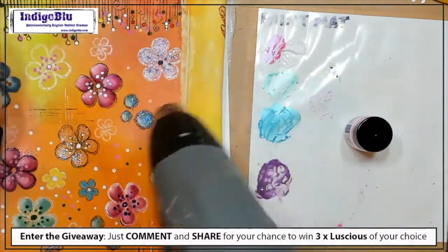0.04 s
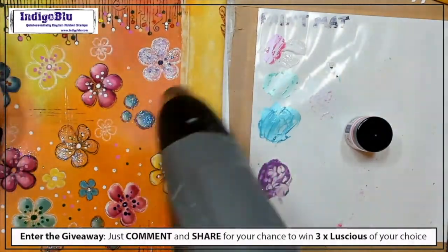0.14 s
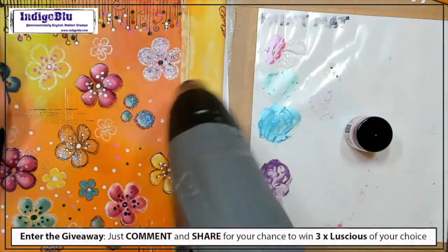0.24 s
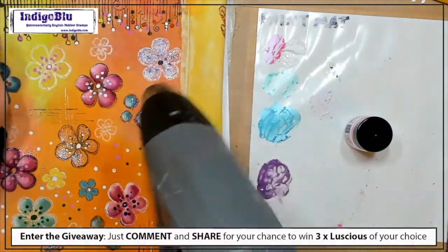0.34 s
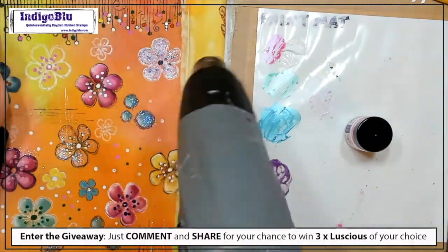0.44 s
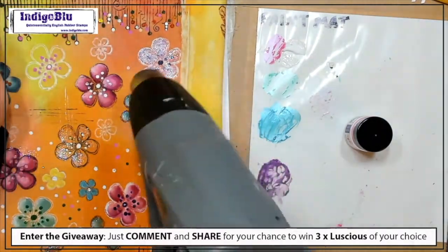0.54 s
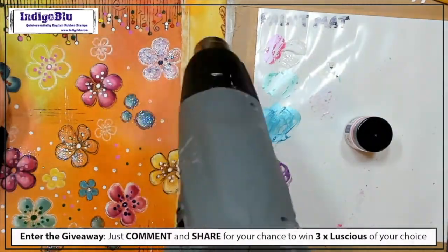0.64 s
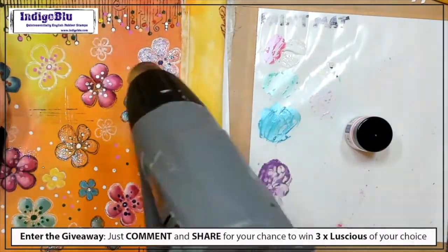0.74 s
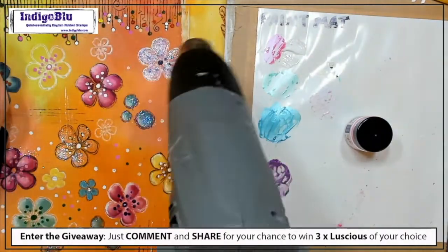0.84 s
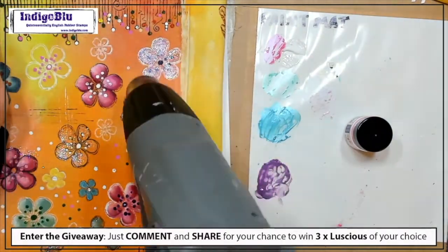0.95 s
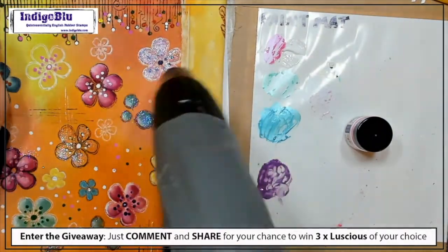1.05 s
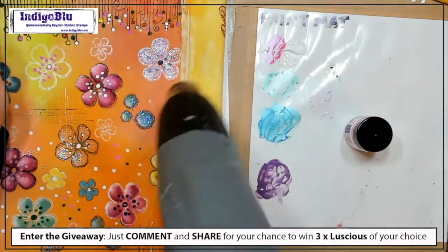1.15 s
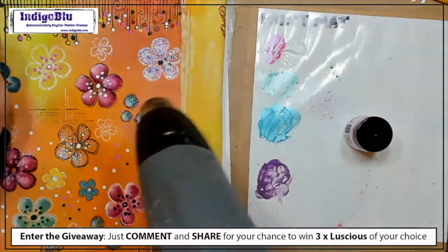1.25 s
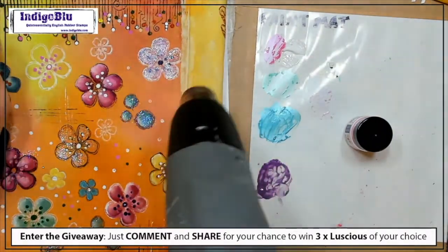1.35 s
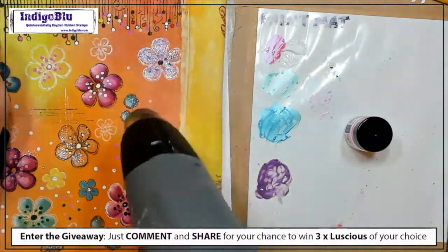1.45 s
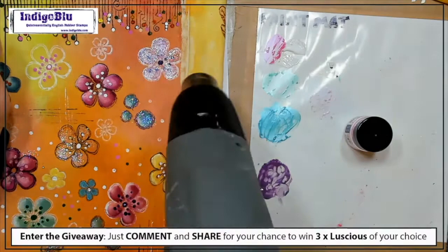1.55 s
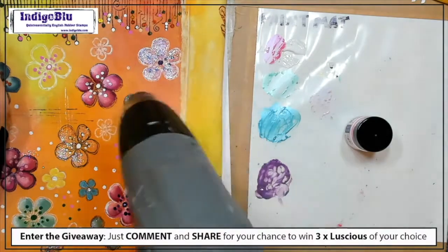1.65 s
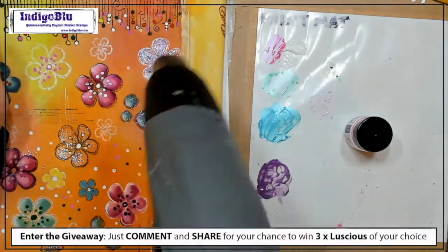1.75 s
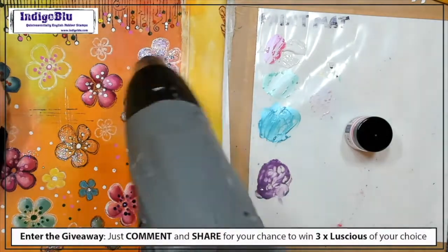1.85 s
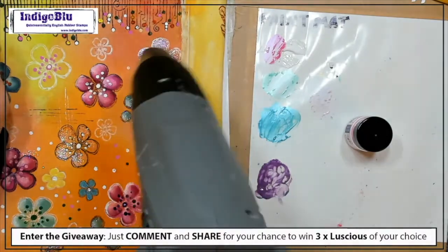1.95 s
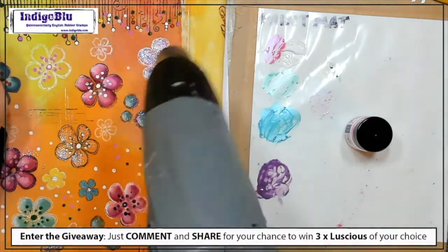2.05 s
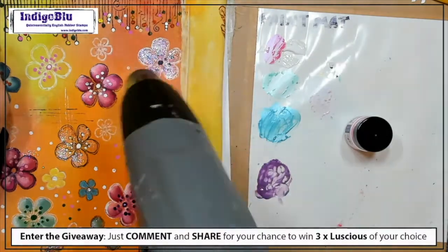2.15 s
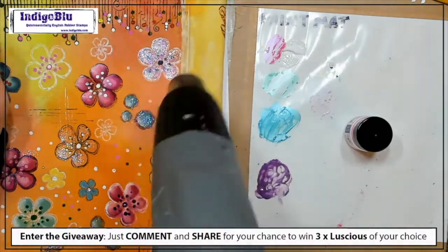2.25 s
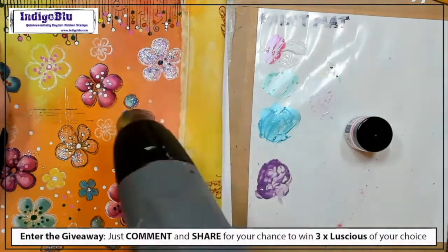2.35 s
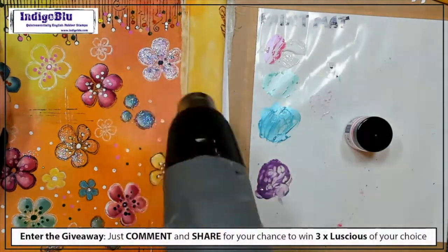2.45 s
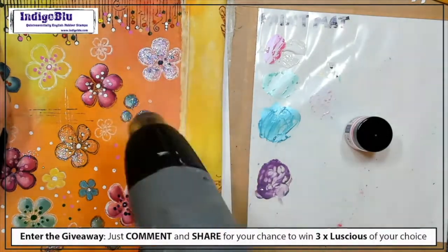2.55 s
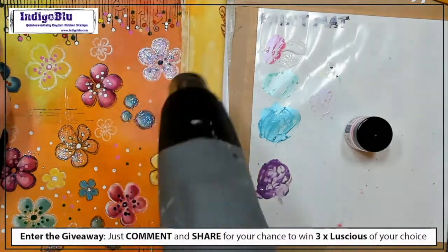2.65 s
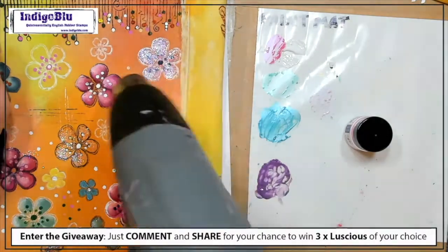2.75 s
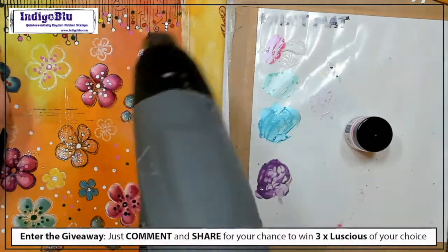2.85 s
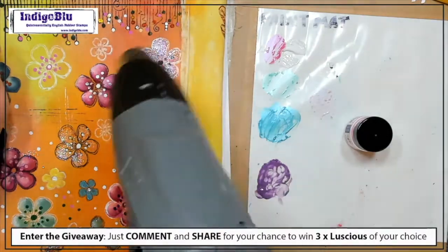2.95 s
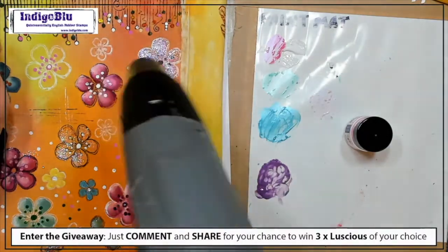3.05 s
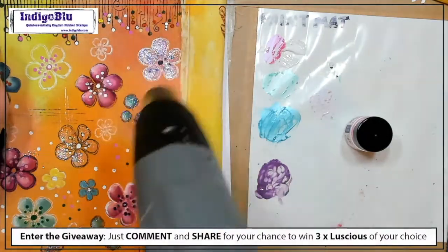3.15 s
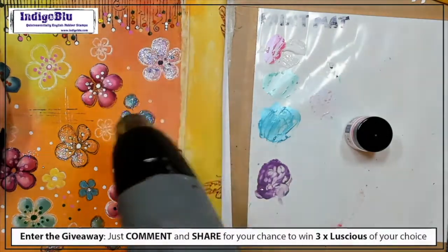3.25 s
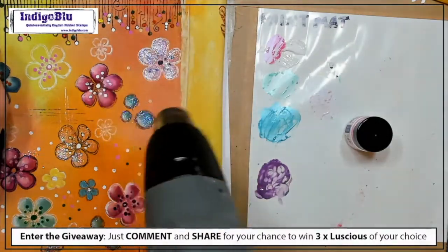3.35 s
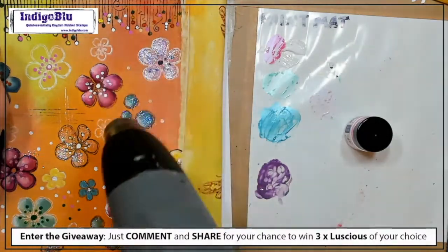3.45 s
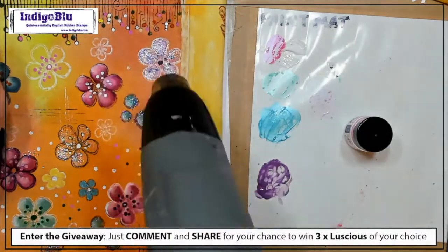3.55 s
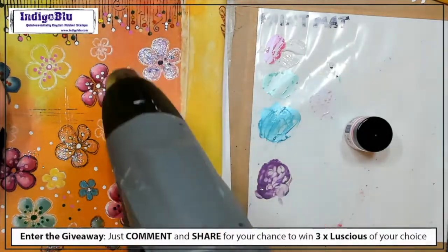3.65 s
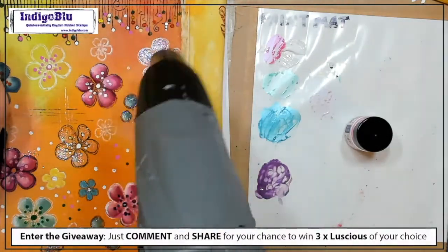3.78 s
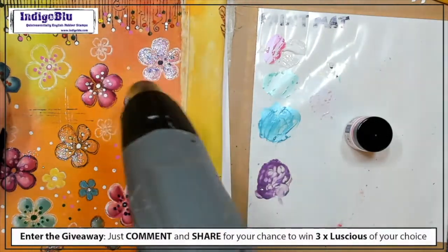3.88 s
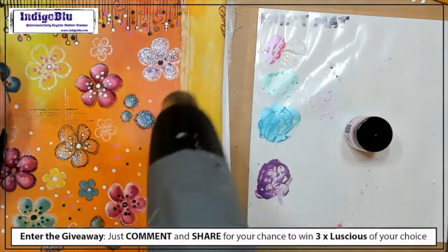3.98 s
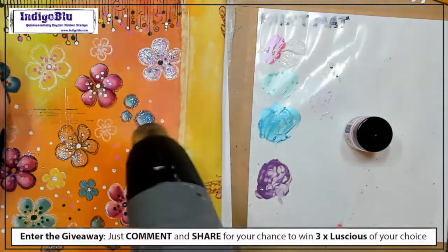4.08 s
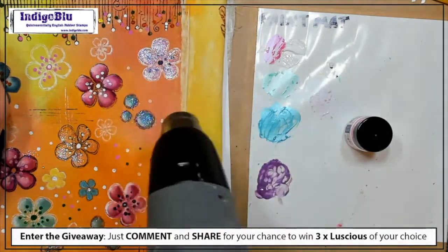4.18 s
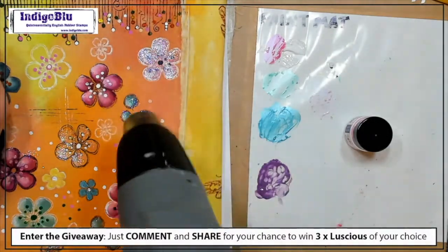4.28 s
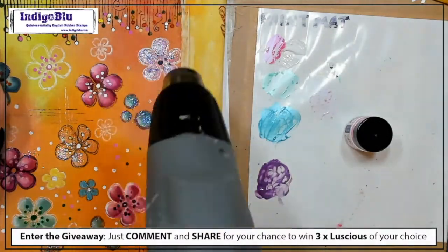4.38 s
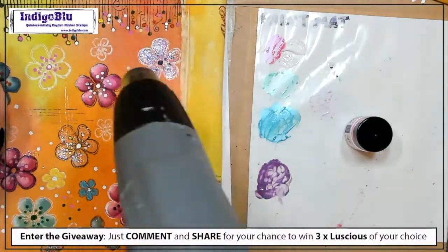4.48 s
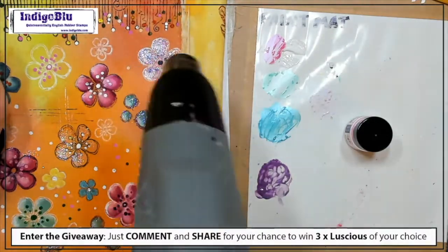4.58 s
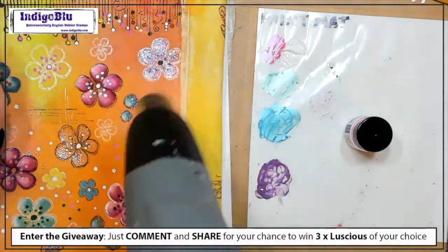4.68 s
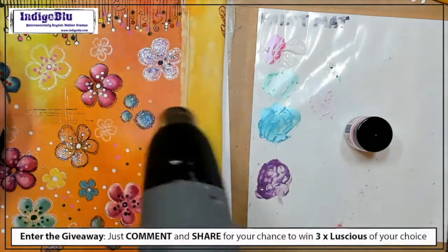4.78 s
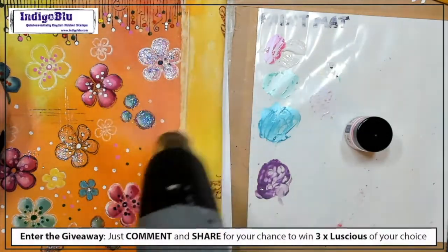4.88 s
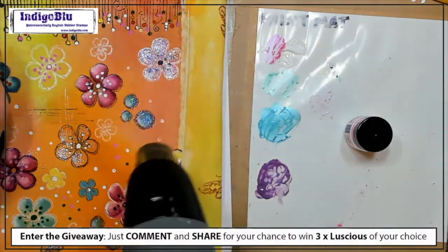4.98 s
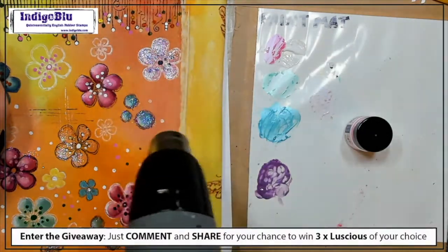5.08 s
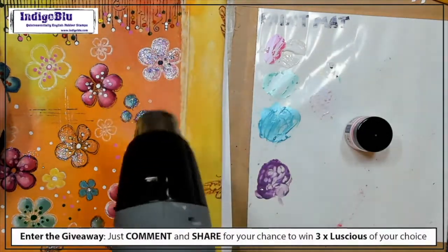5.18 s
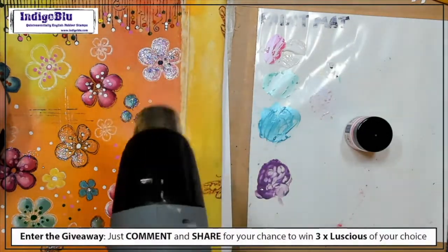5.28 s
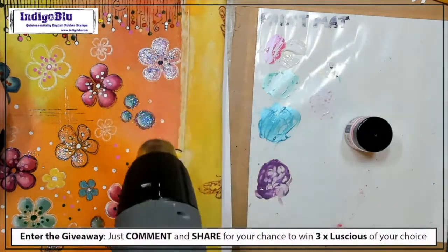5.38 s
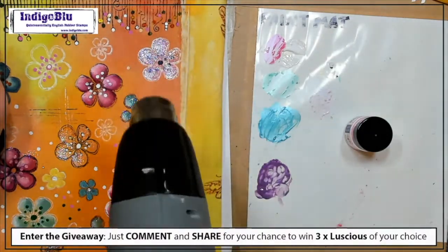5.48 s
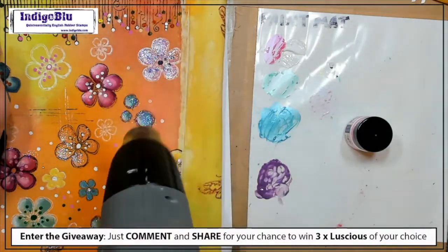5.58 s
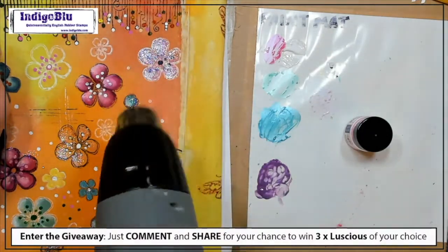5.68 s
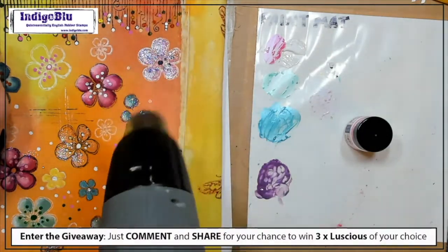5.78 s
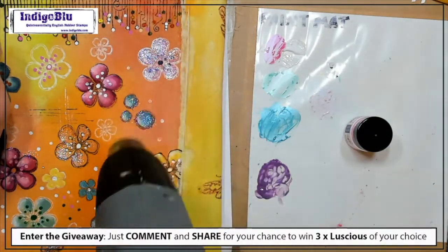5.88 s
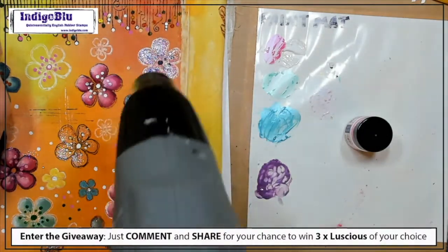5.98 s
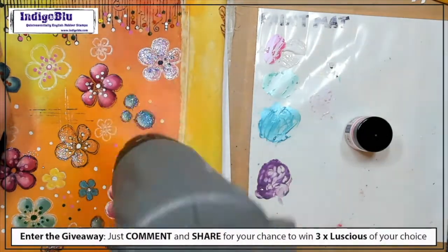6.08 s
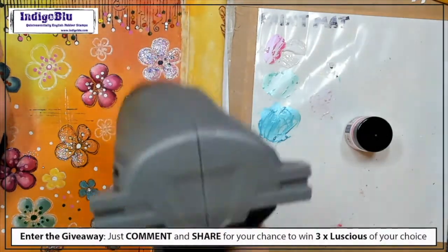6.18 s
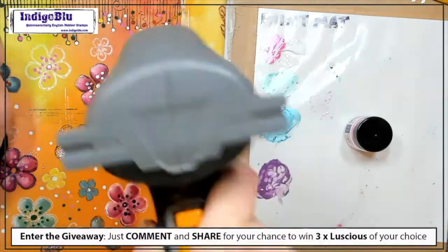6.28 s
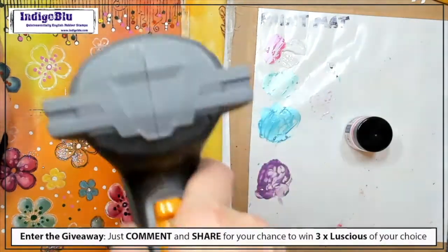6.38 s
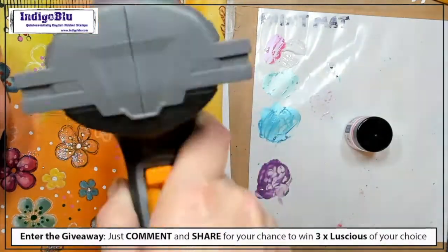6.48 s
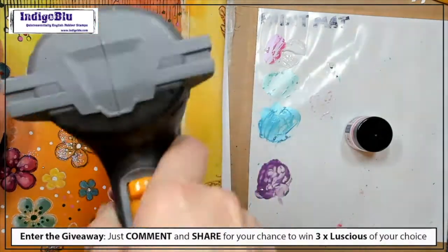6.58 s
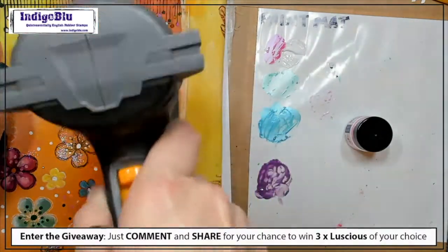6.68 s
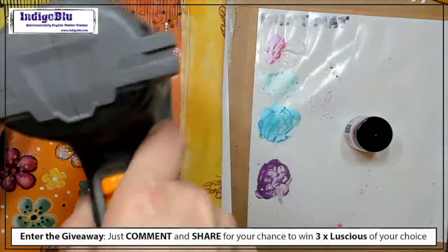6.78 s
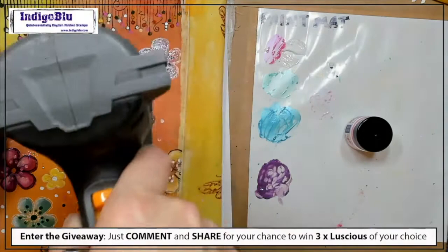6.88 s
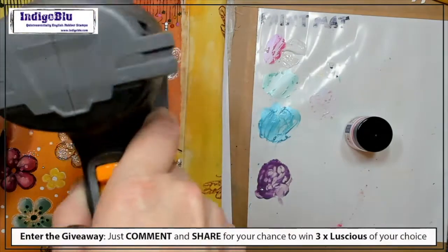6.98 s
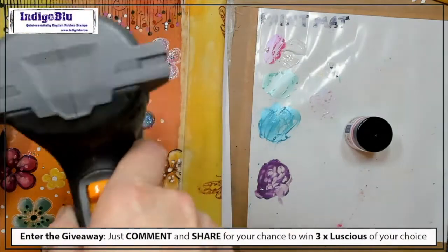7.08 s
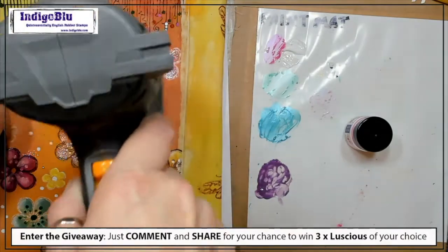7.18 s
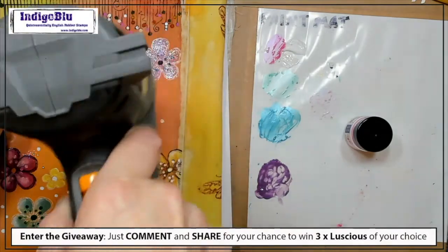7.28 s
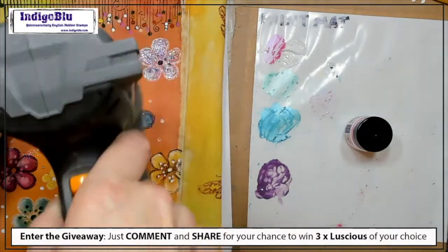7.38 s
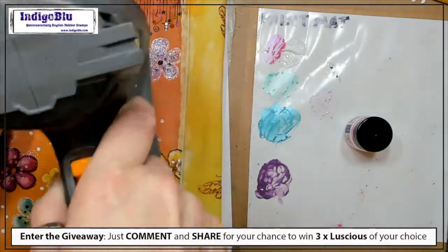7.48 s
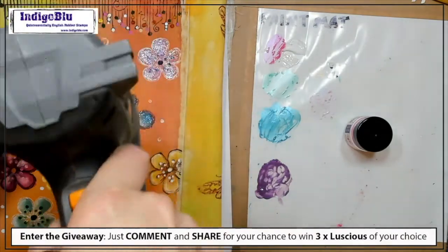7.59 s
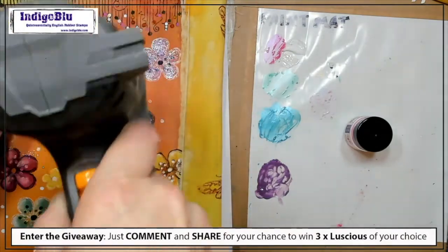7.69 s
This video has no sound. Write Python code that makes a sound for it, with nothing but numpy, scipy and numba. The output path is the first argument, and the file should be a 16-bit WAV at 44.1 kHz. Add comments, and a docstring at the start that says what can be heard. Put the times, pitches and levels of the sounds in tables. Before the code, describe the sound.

A hot-air gun blasts close to a microphone above a craft table. A steady motor whine creeps slightly upward over low rumble, with broad rushing air and hiss pulsing quickly as the nozzle sweeps over paper. The rush gradually becomes hollow. Just after five seconds the blast drops away, leaving much quieter, broken hoots, narrow ringing chirps, rasp and sizzle to the end.

```python
"""At a craft table, a heat gun is waved over a painted page, close to a microphone above the table.
Its fan whines on multiples of the shaft rate: sine tones that creep up in pitch, over a low rumble of noise.
The blast is coloured noise: a barrel drone, a rush that turns hollow, and hiss off the paper at each pass.
After five seconds it thins to narrow ringing bands of noise in short, uneven hoots, with rasp and sizzle."""
import sys
import numpy as np
from scipy import signal
from scipy.fft import rfft, irfft, next_fast_len
from scipy.io import wavfile
from scipy.ndimage import uniform_filter1d, map_coordinates
from numba import njit

SR = 44100
rng = np.random.default_rng(int(sys.argv[2]) if len(sys.argv) > 2 else 0)


def transcribe(signal):
    """Save signal, clipped to [-1, 1], as a 16-bit WAV file at the path in sys.argv[1]."""
    frames = np.atleast_2d(signal).T
    limited = np.clip(frames, -1, 1)
    pcm = np.round(limited * 32767).astype(np.int16)
    wavfile.write(sys.argv[1], SR, pcm)


N = 340893  # length in samples

# Low rumble of the air. Each row: time in seconds, level in dB.
RUMBLE_LEVEL = [(0, -45), (2.2, -41.5), (4.7, -41), (5.2, -55), (6, -55), (6.7, -63), (7.1, -57),
                (7.73, -56)]
# Upper part of the rumble against its deep part. Each row: time in seconds, change in dB.
RUMBLE_UPPER = [(1.15, 3), (2.8, -12), (4.6, -21), (4.8, -13), (5.8, -17), (6.3, -6)]
# Colour of the rumble. Each row: frequency in Hz, relative strength in dB per Hz.
RUMBLE_COLOUR = [(15, -45), (25, -32), (60, -28), (86, -14.5), (124, -23.5), (149, -13.5), (225, -1),
                 (316, 0.5), (437, 4), (518, 4), (560, -51), (730, -37), (1230, -120)]

# Fan tones. Each row: multiple of the shaft rate, relative dB in the open rush, relative dB in the hollow rush.
FAN_TONES = [(2, 1, -52), (3, -7.5, -4.5), (4, -4, -3), (5, -4, -13), (6, -1, 2), (7, -3.5, -3.5),
             (8, -11, -9.5), (9, -12, -15), (10, -28.5, -13.5), (12, -14, -19)]
# Fine motor whistle. Each row: multiple of the shaft rate, relative level in dB.
WHISTLE_TONES = [(18, 6), (21, 4), (30, -1), (34, -12), (36, -9), (37, -12), (38, -13), (39, -11), (40, -3),
                 (41, -5), (42, -11), (43, -10), (44, -8), (45, -11)]
# Hum at the shaft rate. Each row: time in seconds, level in dB.
HUM_LEVEL = [(0, -66), (2.4, -53), (3.3, -51), (4.7, -48.5), (5.14, -47.5), (5.18, -35), (5.35, -53.5),
             (5.95, -55), (6.3, -72), (6.9, -61), (7.73, -52)]
# The shaft rate at first and in the end, and how slowly it settles.
SHAFT_START_HZ, SHAFT_END_HZ, SETTLE_S = 338.4, 345.4, 1.85
# The tones hold their level, then sink as the blast thins.
WHINE_DB, WHINE_THIN_DB, WHISTLE_DB, WHISTLE_THIN_DB = -24.5, -55.5, -44.5, -84
WHISTLE_LEAD_S = 0.16  # how far the whistle sinks ahead of the blast

# Brief swells of narrow, ringing bands of noise.
# Each row: middle in seconds, centre in Hz, width in Hz, half length in seconds, level in dB.
SWELLS = [(1.832, 1730, 200, 0.041, -30), (2.798, 1860, 200, 0.062, -30), (4.349, 1920, 250, 0.067, -29),
          (4.768, 1800, 398, 0.049, -26.5), (4.961, 1670, 300, .035, -31), (5.051, 1930, 220, 0.019, -23.5),
          (5.129, 2400, 450, 0.074, -32.5), (5.658, 690, 109, 0.015, -38.5),
          (5.227, 3240, 350, 0.15, -38.5), (5.389, 2405, 79, 0.052, -31), (5.645, 2040, 196, 0.036, -31),
          (5.749, 3150, 220, 0.07, -38.5), (5.847, 2400, 66, 0.03, -30), (6.057, 3300, 450, 0.03, -31),
          (5.925, 2800, 180, 0.022, -40), (6.178, 3420, 450, 0.048, -36), (6.377, 2410, 110, 0.019, -35),
          (6.432, 9550, 700, 0.072, -46), (6.545, 2690, 322, 0.031, -33.5), (6.637, 2420, 110, 0.029, -28),
          (6.735, 2380, 110, 0.021, -27.5), (6.881, 2430, 80.5, 0.046, -30.5),
          (6.974, 2440, 160, 0.02, -32.5), (7.119, 2470, 110, 0.015, -33), (7.173, 3030, 200, 0.074, -39),
          (7.285, 760, 120, .009, -40), (7.223, 2384, 110, 0.036, -32.5), (7.635, 2400, 110, 0.038, -34.5)]
ATTACK_POWER, RELEASE_POWER = 3.2, 2.15  # every swell opens abruptly and dies away more gently

# Faint flickering noise under the swells. Each row: time in seconds, level in dB.
FAINT_LEVEL = [(5.2, -48), (6.05, -46), (6.4, -44), (7.73, -47)]
# Colour of the faint noise. Each row: frequency in Hz, relative strength in dB per Hz.
FAINT_COLOUR = [(120, -9), (220, -11.5), (520, -5.5), (750, 4), (1400, -48), (2100, 9), (2450, -3.5),
                (2800, 4.5), (3150, 0), (3600, 6), (4600, -52)]
# Steadier rasp. Each row: time in seconds, level in dB.
RASP_LEVEL = [(5.14, -45), (5.18, -33.5), (5.37, -35), (5.43, -48), (5.49, -34.5), (5.88, -41), (5.94, -35),
              (6.03, -45), (6.21, -42.5), (6.29, -49), (6.45, -46), (6.51, -35), (6.57, -44), (6.63, -32.5),
              (6.7, -41), (6.73, -34.5), (7.44, -34.5), (7.52, -43), (7.65, -32)]
# Colour of the rasp. Each row: frequency in Hz, relative strength in dB per Hz.
RASP_COLOUR = [(3500, -20), (3720, 11), (3850, 16), (4030, 20), (4180, 16), (4330, 11), (4650, -3.5),
               (5000, -25)]
# Swells of a patchy sizzle.
# Each row: middle in seconds, half length in seconds, level in dB, treble level in dB.
SIZZLES = [(5.21, 0.06, -38.5, -73), (5.59, 0.051, -49, -86), (5.805, 0.14, -47, -84),
           (5.936, 0.027, -68, -71), (6.068, 0.023, -54, -66), (6.268, 0.056, -55.5, -60.5),
           (6.47, .05, -52, -58), (6.73, 0.059, -50, -58), (6.933, 0.05, -45, -43.5),
           (7.175, 0.056, -42, -47), (7.437, 0.067, -36, -44.5), (7.69, .06, -42.5, -44.5)]
# Colour of the sizzle. Each row: frequency in Hz, relative strength in dB per Hz.
SIZZLE_COLOUR = [(4600, -1), (5000, -3.5), (5450, 10.5), (6100, -1.5), (7000, 1.5), (8600, -12), (9500, -4),
                 (10400, -7.5), (11500, -18.5), (12300, -10), (12900, -10), (13500, -13), (15800, -39)]
# Bursts of the hollow hoot. Each row: middle in seconds, half length in seconds, pitch in Hz, level in dB.
HOOTS = [(5.073, 0.017, 1115, -29), (5.115, 0.025, 1320, -25.5), (5.178, 0.033, 1274, -20),
         (5.22, 0.036, 1320, -25.5), (5.441, 0.031, 1293, -32), (5.711, 0.025, 1236, -29.5),
         (5.906, 0.024, 1144, -23), (5.968, 0.024, 1187, -25), (6.154, 0.022, 1012, -23),
         (6.202, 0.015, 1019, -20), (6.234, 0.023, 1085, -28), (6.377, 0.016, 1076, -28.5),
         (6.418, 0.01, 1090, -24), (6.464, 0.032, 1056, -20), (6.518, .008, 1085, -29),
         (6.676, 0.016, 1027, -26), (6.723, 0.023, 1045, -24.5), (6.879, 0.02, 1064, -30),
         (6.967, 0.029, 1060, -34), (7.11, 0.03, 1040, -28.5), (7.151, .015, 1070, -31),
         (7.173, 0.0079, 1085, -21.5), (7.199, 0.024, 1052, -24.5), (7.395, 0.027, 1024, -29.5),
         (7.432, 0.018, 1017, -27.5), (7.479, 0.014, 1035, -27), (7.623, 0.016, 1040, -27.5),
         (7.696, .022, 1040, -34)]
# Bursts of the ring above the hoot. Each row: middle in seconds, half length in seconds, level in dB.
OVERTONES = [(5.373, 0.013, -28.5), (5.416, 0.026, -28.5), (5.936, 0.02, -29), (5.969, 0.0099, -27),
             (6.105, 0.032, -28.5), (6.122, .009, -24), (6.154, 0.025, -26.5), (6.194, 0.023, -29),
             (6.254, .008, -28), (6.297, 0.01, -28.5), (6.353, 0.024, -24.5), (6.417, 0.025, -26),
             (6.466, 0.033, -27), (6.543, .015, -31), (6.594, .007, -24.5), (6.63, 0.02, -27),
             (6.662, 0.0098, -27), (6.861, .023, -29.5), (7.115, .008, -30), (7.16, 0.019, -32),
             (7.218, 0.02, -31.5), (7.394, 0.011, -27.5), (7.425, 0.021, -27), (7.474, 0.026, -32),
             (7.648, 0.035, -32), (7.711, 0.026, -29.5)]
# Quiet thin noise between the bursts.
# Each row: time in seconds, hoot in dB, overtone in dB, sizzle in dB, treble of the sizzle in dB.
LULL = [(5.3, -55, -63, -52.5, -70), (5.85, -52, -57, -58, -91), (5.98, -36.5, -40, -74, -75),
        (6.3, -39, -42, -65, -75), (6.58, -40.5, -42, -71, -52.5), (6.8, -38.5, -35, -62, -50.5),
        (7.05, -42, -43, -60, -54), (7.3, -45, -47.5, -56, -52), (7.73, -38.5, -36.5, -48, -57)]
UNDERTONE_HZ, UNDERTONE_DB = 706, -27.5  # low ring under each hoot, against the hoot
FLUTTER_DB = 1.5  # quick flutter of the ringing bands
RING_EVEN_S = 0.022  # a ringing band holds its level over this long
EMERGE_S = 0.023  # fade-in of the thin noise

# Strength of the blast before it thins. Each row: time in seconds, rush in dB, hiss in dB.
BLAST_LEVEL = [(0, -23, -29.5), (2.2, -23.5, -29), (2.8, -22, -30.5), (3.4, -22.5, -28),
               (4.78, -21.5, -32.5), (4.92, -25, -32), (5.12, -34, -41), (5.28, -45, -66)]
# Colour of the open rush. Each row: frequency in Hz, relative strength in dB per Hz.
RUSH_OPEN = [(530, -29), (900, -0.5), (1140, -3), (1570, -2.5), (1650, -2.5), (1820, -7), (2100, -5),
             (2270, -3.5), (2330, -3.5), (2510, -22), (3300, -43), (4290, -52), (7260, -120)]
# Colour of the hollow rush. Each row: frequency in Hz, relative strength in dB per Hz.
RUSH_HOLLOW = [(530, -54), (900, -48), (1000, -10.5), (1140, 6), (1420, -4.5), (1560, -13.5), (1810, -13),
               (2000, -1), (2140, -3), (2280, -10.5), (2330, -8.5), (2490, -5.5), (2530, -5), (2710, -6.5),
               (3300, -30), (4290, -146), (7260, -120)]
# Colour of the hiss in the open rush. Each row: frequency in Hz, relative strength in dB per Hz.
HISS_OPEN = [(1820, -22), (3100, -0.5), (3530, 2), (3910, -1), (4040, 0.5), (4670, -5.5), (5960, -2.5),
             (6520, -11), (7470, -8), (8440, -13), (10300, -13.5), (11200, -18.5), (13100, -21),
             (14300, -34), (15800, -40)]
# Colour of the hiss once it is hollow. Each row: frequency in Hz, relative strength in dB per Hz.
HISS_HOLLOW = [(1530, -66), (2600, -8.5), (2720, -14.5), (2950, -1.5), (3570, -6.5), (3700, -11.5),
               (4050, -8), (4890, -16.5), (5640, -7.5), (5990, -8.5), (6910, -14), (7510, -10.5),
               (8410, -17), (9920, -18.5), (10400, -20), (11200, -25), (13000, -30), (14200, -41),
               (15700, -40)]
# Drone of the barrel. Each row: time in seconds, level in dB.
DRONE_LEVEL = [(0, -24), (1.2, -23), (2.55, -25.5), (3.2, -37), (3.6, -29), (4.2, -41), (4.62, -35.5),
               (4.8, -64)]
# Colour of the drone. Each row: frequency in Hz, relative strength in dB per Hz.
DRONE_COLOUR = [(310, -30), (520, -16), (600, -9), (715, 6.5), (746, 8.5), (867, -4), (980, 1.5),
                (1270, -9.5), (2160, -120)]
# The fading drone comes back in surges. Each row: middle in seconds, level in dB.
SURGES = [(2.66, -25), (3.39, -31), (3.539, -24.5), (3.71, -27.5), (3.85, -39), (4.02, -31), (4.36, -33),
          (4.59, -27)]
SURGE_HALF_S = 0.036  # half length of each surge
THINS_S, THINNING_S = 5.226, 0.39  # middle and length of the change from blast to thin bands of noise
HOLLOW_FROM_S, HOLLOW_BY_S, HOLLOW_AT_FIRST = 0.88, 2.95, 0.14  # the rush turns from open to hollow
# The nozzle passes to and fro: passes a second, time of one pass, swing of the hiss level.
PASS_HZ, PASS_S = 4.59, 2.275
PASS_OPEN_DB, PASS_HOLLOW_DB = -0.2, 1.5  # a negative swing dips at PASS_S
# Early reflections from the things on the table. Each row: delay in seconds, gain against the direct sound.
REFLECTIONS = [(.00155, 0.17), (.0029, -0.26), (.0047, 0.26), (.0083, -0.23)]
TOP_HZ = 15750  # upper limit of the recorder

T = np.arange(N) / SR  # time of every sample in seconds


def undb(db):
    """Decibels to gain."""
    return np.exp(np.asarray(db) * (np.log(10) / 20))


def unit(x):
    """Scale to rms 1."""
    return x / np.sqrt(np.mean(x ** 2))


def even(x, even_s):
    """Level a sound: it flutters quickly but holds about rms 1 over longer stretches."""
    power = uniform_filter1d(x ** 2, max(int(even_s * SR), 2), mode="wrap")
    return x / np.sqrt(power)


def curves(table):
    """Each column of a timed table, joined by straight lines at every sample."""
    s, *columns = np.transpose(table)
    return [np.interp(T, s, column) for column in columns]


def walk(rate, size=4096):
    """Smooth chance with spread 1 that turns about `rate` times a second."""
    hz = np.arange(size // 2 + 1) * SR / N
    spectrum = rfft(rng.standard_normal(size)) * np.exp(-(hz / rate) ** 2)
    coarse = unit(irfft(spectrum))
    return np.interp(np.arange(N), np.linspace(0, N, size), coarse)


def flickering_noise(colour, flicker_db, flicker_rate, count):
    """Overlapping bands of coloured noise, each flickering on its own."""
    size = next_fast_len(N, True)
    octave = np.log2(np.maximum(np.arange(size // 2 + 1) * SR / size, 1))
    hz, db = np.transpose(colour)
    # silent outside the listed frequencies
    gain = undb(np.interp(octave, np.log2(hz), db, left=-np.inf, right=-np.inf))
    spectrum = rfft(rng.standard_normal(size)) * gain
    place = np.interp(octave, np.log2([hz[0], hz[-1]]), [0, count - 1])
    total = 0
    for k in range(count):
        share = np.maximum(1 - abs(place - k), 0)
        band = irfft((spectrum * share).astype(np.complex64), size)[:N]
        total = total + band * undb(flicker_db * walk(flicker_rate))
    return unit(total)


@njit
def bandpass(x, hz, width):
    """State-variable band-pass whose centre may move."""
    y, band, low = np.empty(len(x)), 0., 0.
    for i in range(len(x)):
        g, damping = np.tan(np.pi * hz[i] / SR), width / hz[i]
        v = (band + g * (x[i] - low)) / (1 + g * (g + damping))
        band, low, y[i] = 2 * v - band, low + 2 * g * v, damping * v
    return y


def ring(hz, width_hz):
    """Noise ringing in one steep resonance, made of two equal band-passes."""
    centre = hz * np.ones(N)
    once = bandpass(rng.standard_normal(N), centre, float(width_hz))
    twice = bandpass(once, centre, float(width_hz))
    return even(twice, RING_EVEN_S)


def split(x, hz):
    """The parts of a sound below and above a frequency."""
    low = signal.sosfiltfilt(signal.butter(N=5, Wn=hz, fs=SR, output="sos"), x)
    return low, x - low


def swell_shape(u):
    """Gain of one swell; u is time from its middle, in half lengths."""
    return np.exp(-abs(u) ** np.where(u < 0, ATTACK_POWER, RELEASE_POWER))


def pulses(times, half_lengths, dbs, lull_db):
    """Gain of swells that rise out of a quieter lull; their powers add."""
    power = np.zeros(N)
    for s, half_s, db in zip(times, half_lengths, dbs):
        near = slice(*np.searchsorted(T, [s - 2 * half_s, s + 3 * half_s]))
        power[near] += (undb(db) * swell_shape((T[near] - s) / half_s)) ** 2
    return np.sqrt(power + undb(lull_db) ** 2)


def table_echo(x, lag_s, swing, share, wave_rate):
    """The table throws the sound back; the path changes as the hand moves, so the colour sweeps."""
    lag = lag_s * SR * (1 + swing * walk(wave_rate))
    echo = map_coordinates(x, [np.arange(N) - lag], order=2)
    return (x + share * echo) / np.sqrt(1 + share ** 2)


def reflected(x):
    """Nearby surfaces add fixed short echoes, which leave a steady fine ripple in the colour."""
    echoes = sum(gain * np.roll(x, int(lag_s * SR)) for lag_s, gain in REFLECTIONS)
    return (x + echoes) / np.sqrt(1 + sum(gain ** 2 for _, gain in REFLECTIONS))


def hollowness():
    """Share of the rush that is hollow, 0-1."""
    return np.interp(T, [HOLLOW_FROM_S, HOLLOW_BY_S], [HOLLOW_AT_FIRST, 1])


def thinness(lead_s=0):
    """How far the blast has given way to thin bands of noise, 0-1."""
    return np.clip(0.5 + (T + lead_s - THINS_S) / THINNING_S, 0, 1)


def rumble():
    """Low, gusty air, as coloured noise; the level of its upper part moves on its own."""
    noise = flickering_noise(RUMBLE_COLOUR, flicker_db=3.5, flicker_rate=11, count=6)
    deep, upper = split(noise, hz=335)
    return (deep + upper * undb(curves(RUMBLE_UPPER)[0])) * undb(curves(RUMBLE_LEVEL)[0])


def tones(table, phase, waver_db, rough):
    """Multiples of the shaft rate, wavering as the gun turns and shaken by the turbulent air."""
    total = 0
    for k, db in table:
        size = undb(db + waver_db * walk(6.5)) * (1 + rough * walk(40))
        total = total + size * np.sin(k * phase + rng.uniform(0, 2 * np.pi))
    return unit(total)


def fan():
    """The motor creeps up to speed; its shaft jitters, which blurs the highest tones."""
    hollow = hollowness()
    shaft_hz = SHAFT_END_HZ + (SHAFT_START_HZ - SHAFT_END_HZ) * np.exp(-T / SETTLE_S)
    jitter = 1 + 0.0014 * walk(5.65) + 0.002 * walk(110)
    phase = 2 * np.pi * np.cumsum(shaft_hz * jitter) / SR
    blend = [(k, open_db + hollow * (hollow_db - open_db)) for k, open_db, hollow_db in FAN_TONES]
    whine_db = WHINE_DB + thinness(lead_s=0.033) * (WHINE_THIN_DB - WHINE_DB)
    whine = tones(blend, phase, waver_db=2.0, rough=0.29) * undb(whine_db)
    whistle_db = WHISTLE_DB + thinness(WHISTLE_LEAD_S) * (WHISTLE_THIN_DB - WHISTLE_DB)
    whistle = tones(WHISTLE_TONES, phase, waver_db=2.5, rough=0.55) * undb(whistle_db)
    hum = np.sin(phase) * (1 + 0.75 * walk(32))  # once a turn, from the unbalanced rotor
    return whine + whistle + hum * undb(curves(HUM_LEVEL)[0])


def swells(size=16384):
    """Each swell is a narrow band of noise that rises abruptly and dies away more gently."""
    out = np.zeros(N)
    hz = np.arange(size // 2 + 1) * SR / size
    t = (np.arange(size) - size // 2) / SR
    for s, centre_hz, width_hz, half_s, db in SWELLS:
        resonance = 1 / (1 + ((hz - centre_hz) / (width_hz / 2)) ** 2) ** 1.5
        band = irfft(rfft(rng.standard_normal(size)) * resonance, size)
        shape = swell_shape(t / half_s)
        swell = unit(band * shape) * np.sqrt(np.mean(shape ** 2)) * undb(db)
        at = int(s * SR) - size // 2 + np.arange(size)
        out[at[at < N]] += swell[at < N]
    return out


def faint_noise():
    """Faint flickering noise under the swells."""
    faint = flickering_noise(FAINT_COLOUR, flicker_db=8.5, flicker_rate=17, count=18)
    return even(faint, even_s=0.18) * undb(curves(FAINT_LEVEL)[0])


def rasp():
    """A narrow, steadier band of noise."""
    noise = flickering_noise(RASP_COLOUR, flicker_db=3.5, flicker_rate=30, count=8)
    return even(noise, even_s=0.06) * undb(curves(RASP_LEVEL)[0])


def sizzle():
    """A patchy sizzle swells at listed times; its treble swells by its own amount."""
    s, half_s, db, treble_db = np.transpose(SIZZLES)
    _, _, lull_db, treble_lull_db = curves(LULL)
    noise = flickering_noise(SIZZLE_COLOUR, flicker_db=5.0, flicker_rate=27.0, count=22)
    dull, bright = split(noise, hz=8400)
    dull = even(dull, even_s=0.042) * pulses(s, half_s, db, lull_db)
    bright = even(bright, even_s=0.057) * pulses(s, half_s, treble_db, treble_lull_db)
    return dull + bright


def hoots():
    """A hollow hoot, a low ring under it and a higher ring sputter in short, uneven bursts."""
    s, half_s, pitch_hz, db = np.transpose(HOOTS)
    hoot_lull_db, overtone_lull_db, _, _ = curves(LULL)
    pitch_hz = np.interp(T, s, pitch_hz)  # glides from burst to burst
    hoot = ring(pitch_hz, width_hz=62) + undb(-10.5) * ring(1.09 * pitch_hz, width_hz=115)
    hoot = even(hoot, RING_EVEN_S) + undb(UNDERTONE_DB) * ring(UNDERTONE_HZ, width_hz=53)
    overtone = ring(1738, width_hz=57) + undb(-3) * ring(1858, width_hz=110)
    overtone = even(overtone, RING_EVEN_S)
    ringing = hoot * pulses(s, half_s, db, hoot_lull_db)
    ringing = ringing + overtone * pulses(*np.transpose(OVERTONES), overtone_lull_db)
    return ringing * undb(FLUTTER_DB * walk(60))


def thin_noise():
    """Hoots and sizzle over a steadier rasp and faint noise, faded in as the blast starts to sink."""
    emerges = np.clip((T - THINS_S + THINNING_S / 2) / EMERGE_S, 0, 1)
    return emerges * (hoots() + reflected(rasp() + sizzle()) + faint_noise())


def barrel_drone():
    """Low noise of the air in the barrel, which fades and comes back in surges."""
    surge_s, surge_db = np.transpose(SURGES)
    drone = flickering_noise(DRONE_COLOUR, flicker_db=4.0, flicker_rate=9.6, count=3)
    level = pulses(surge_s, [SURGE_HALF_S] * len(SURGES), surge_db, curves(DRONE_LEVEL)[0])
    return even(drone, even_s=0.084) * level


def paper_hiss():
    """Hiss where the jet meets the paper; it pulses with each pass and turns hollow with the rush."""
    hollow = hollowness()
    hiss = np.sqrt(1 - hollow) * flickering_noise(HISS_OPEN, flicker_db=2.5, flicker_rate=8.1, count=8)
    hiss = hiss + np.sqrt(hollow) * flickering_noise(HISS_HOLLOW, flicker_db=2.0, flicker_rate=15, count=8)
    hiss = reflected(table_echo(hiss, lag_s=0.001097, swing=0.039, share=0.29, wave_rate=4.5))
    swing_db = PASS_OPEN_DB + hollow * (PASS_HOLLOW_DB - PASS_OPEN_DB)
    return hiss * undb(swing_db * np.cos(2 * np.pi * PASS_HZ * (T - PASS_S)))


def air_rush():
    """Broad noise of the jet, blended from open to hollow and swept by its echo off the table."""
    hollow = hollowness()
    rush = np.sqrt(1 - hollow) * flickering_noise(RUSH_OPEN, flicker_db=4.5, flicker_rate=5.2, count=8)
    rush = rush + np.sqrt(hollow) * flickering_noise(RUSH_HOLLOW, flicker_db=1.5, flicker_rate=26.0, count=8)
    rush = table_echo(rush, lag_s=0.001049, swing=0.063, share=0.32, wave_rate=3.5)
    return even(rush, even_s=0.074)


def blast():
    """The jet: a low drone of the barrel, a broad rush, and hiss where it meets the paper."""
    rush_db, hiss_db = curves(BLAST_LEVEL)
    jet = air_rush() * undb(rush_db) + paper_hiss() * undb(hiss_db)
    return barrel_drone() + np.sqrt(1 - thinness()) * jet


def scene():
    """Full blast gives way to thin bands of noise, over the fan and a low rumble; both channels are alike."""
    mono = rumble() + fan() + swells() + thin_noise() + blast()
    return np.array([mono, mono])


def record(dry):
    """The recorder cuts the top with a steep low-pass (0.2 dB ripple, 80 dB down beyond it)."""
    return signal.sosfilt(signal.ellip(10, 0.2, 80, TOP_HZ, fs=SR, output="sos"), dry)


dry = scene()
out = record(dry)
transcribe(out)
```